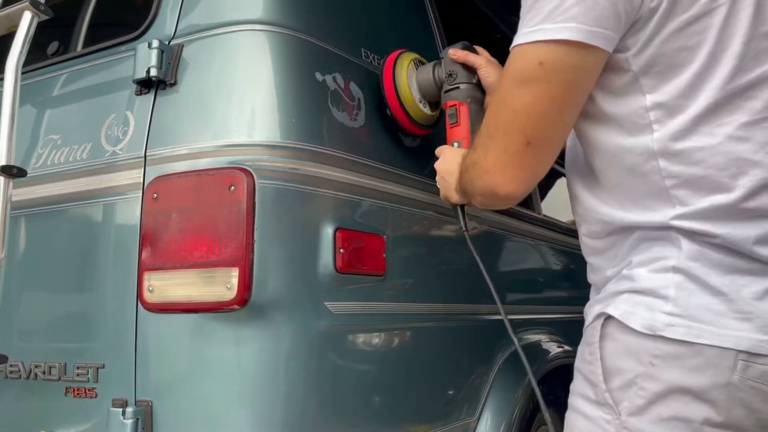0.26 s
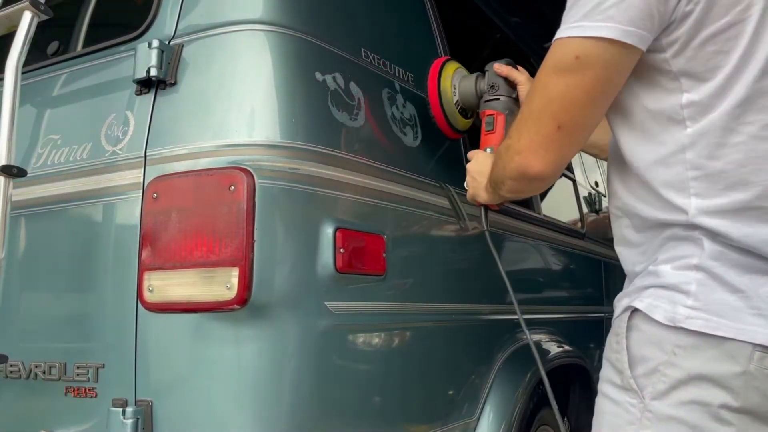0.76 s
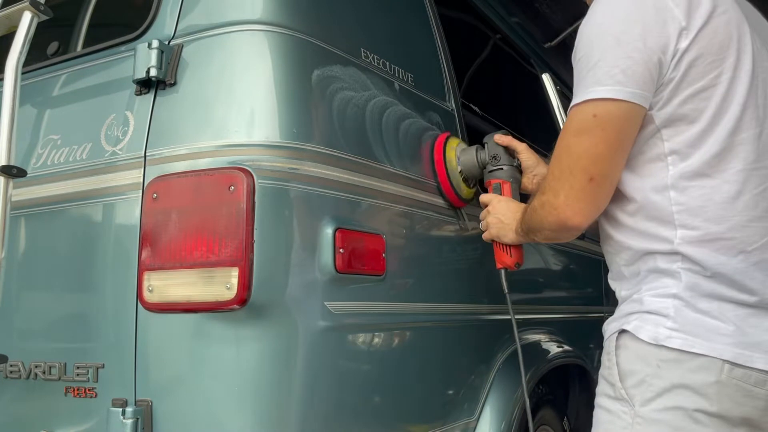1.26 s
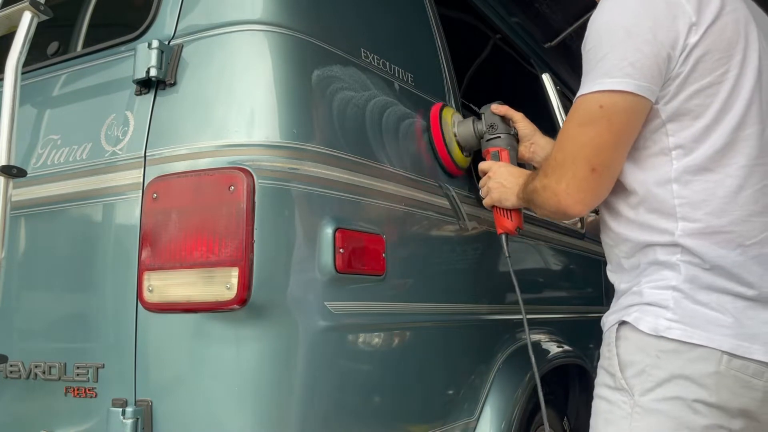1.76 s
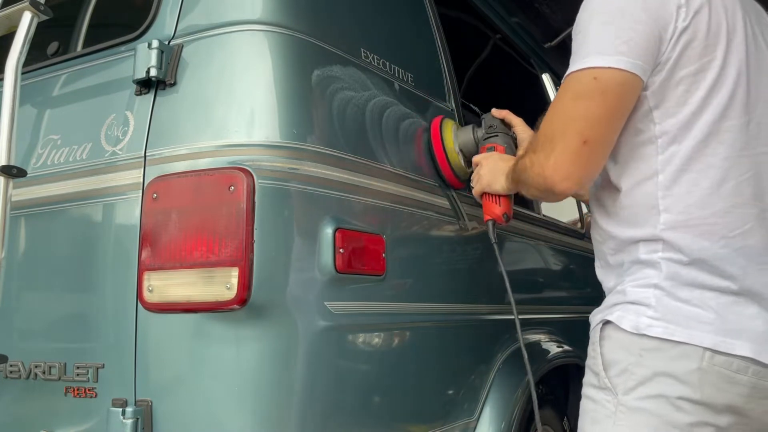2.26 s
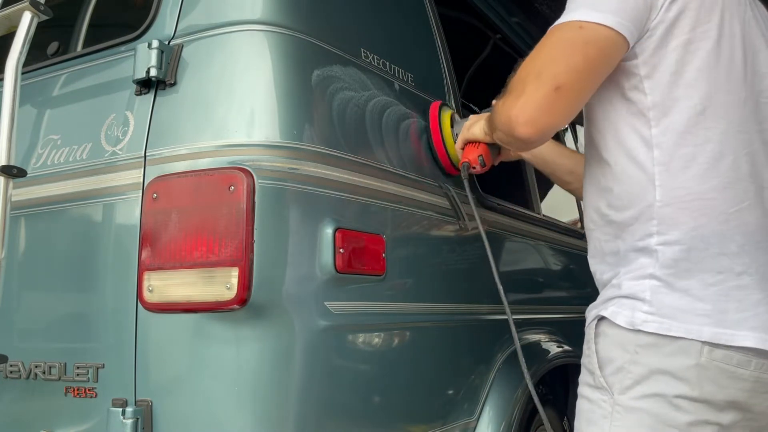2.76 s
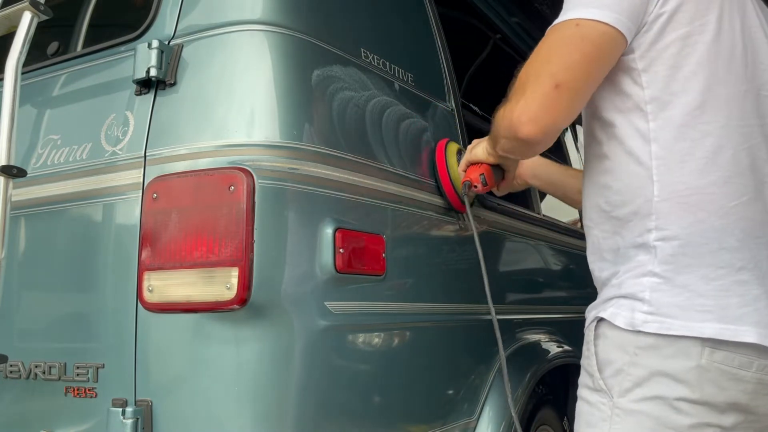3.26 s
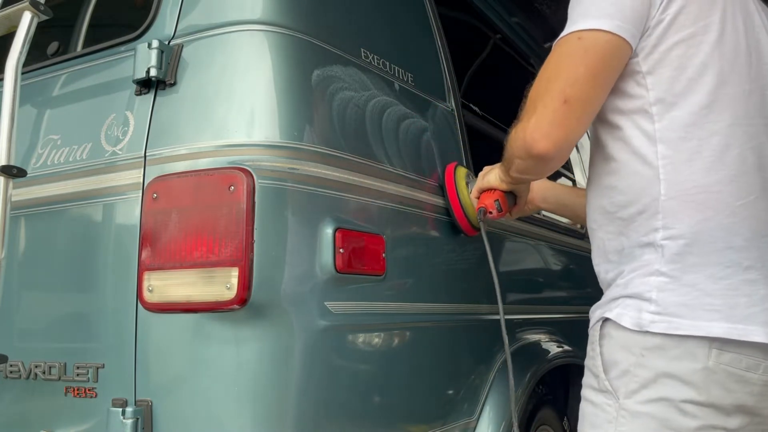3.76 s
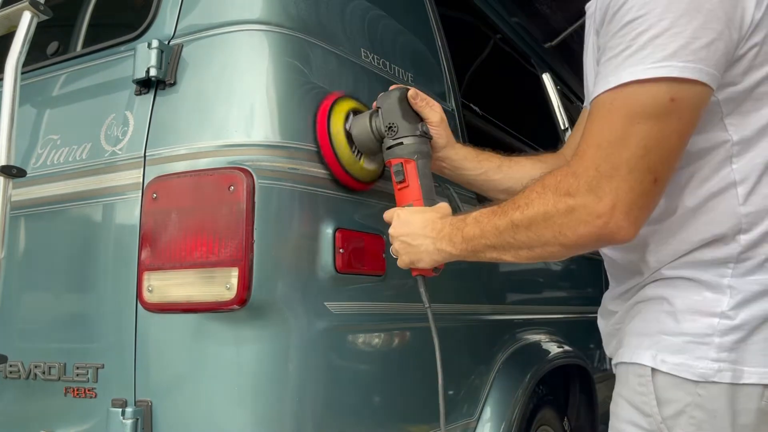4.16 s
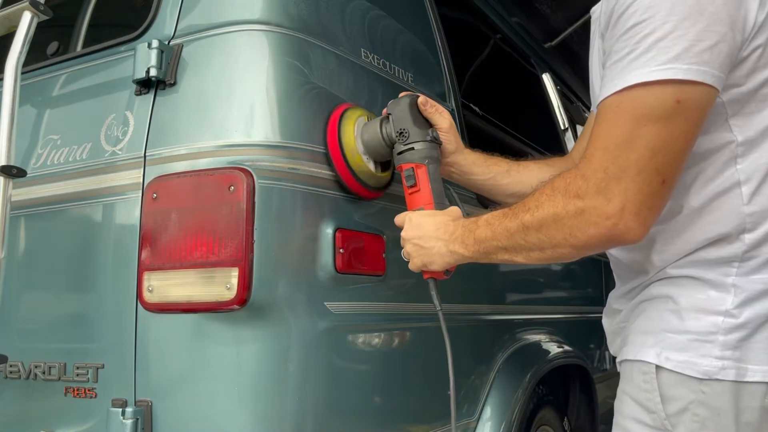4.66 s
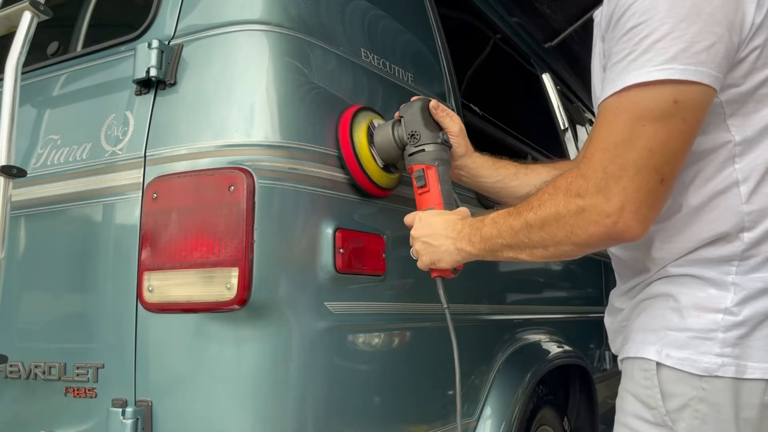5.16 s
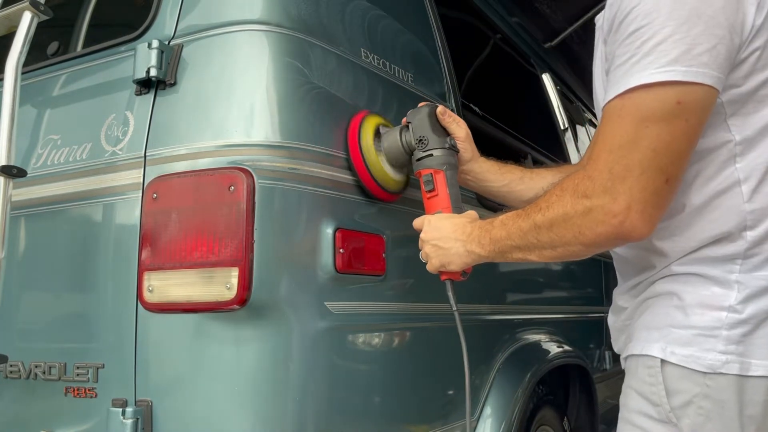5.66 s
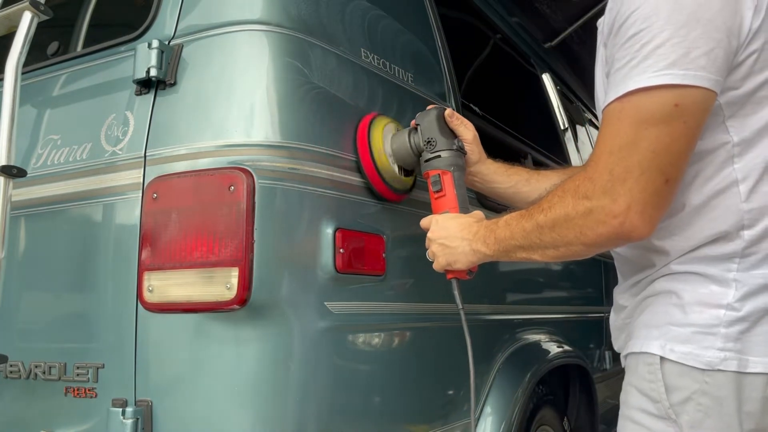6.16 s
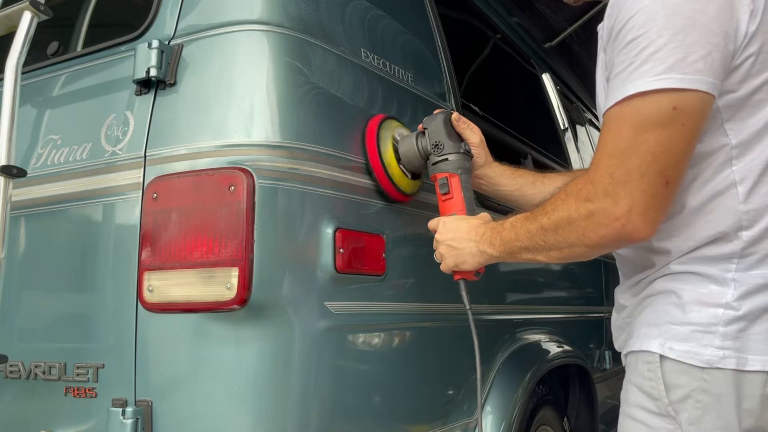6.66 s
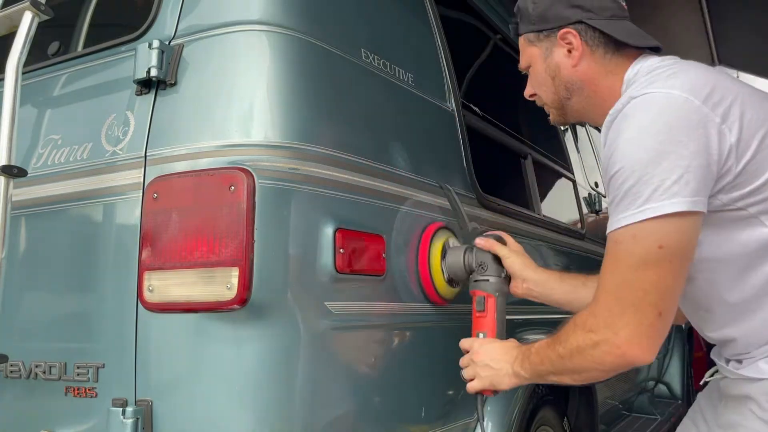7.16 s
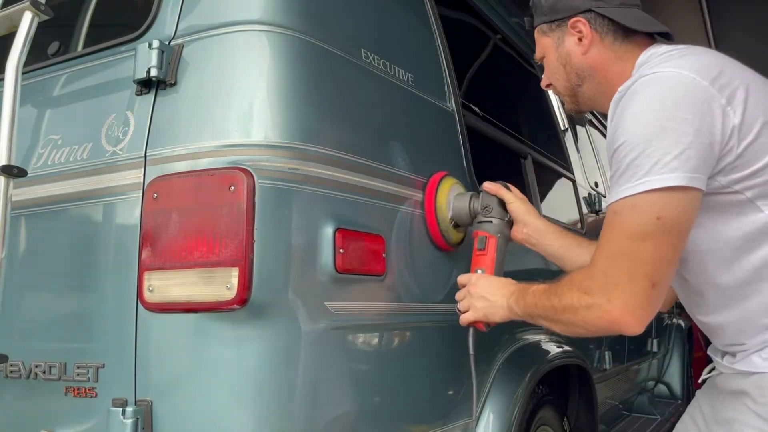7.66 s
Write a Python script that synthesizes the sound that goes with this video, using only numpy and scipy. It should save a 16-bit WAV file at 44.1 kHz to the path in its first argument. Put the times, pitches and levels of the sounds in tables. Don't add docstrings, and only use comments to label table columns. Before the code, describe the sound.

From 0 to 0.9 s the yard is quiet: distant traffic rumbles, swelling slightly near 0.45 s, under thin hiss and a very faint cricket. Dry plastic switch ticks run from 0.27 to 0.65 s, strongest around 0.41-0.45 s. At 0.92 s it cuts instantly to a running polisher: a piercing whine near 9 kHz, fluttering and fading, over moderate fan roar and shaft hum; it dulls around 2.8-3 s. At 4.13 s a cut brings a faster setting, whine near 10.6 kHz, a stronger low hum and panel thump near 62 Hz, and many uneven woody-metallic knocks around 2.5 kHz, densest at first. At 7.03 s a louder passage starts lower, near 8.9 kHz, climbing to about 9.9 kHz by the end; roar and gear hum peak around 7.4 s, then drop back, continuing to the abrupt end at 7.9 s. Close, dry outdoor stereo.

```python
import sys
import numpy as np
from scipy import signal
from scipy.fft import rfft, irfft, next_fast_len
from scipy.io import wavfile
from scipy.ndimage import uniform_filter1d

SR = 44100
rng = np.random.default_rng(int(sys.argv[2]) if len(sys.argv) > 2 else 0)


def volts_from_decibels(level):
    exponent = np.asarray(level, float) / 20
    return 10 ** exponent


def output_pcm(signal):
    pcm = np.clip(np.atleast_2d(signal).T, -1, 1) * 32767
    wavfile.write(sys.argv[1], SR, np.round(pcm).astype(np.int16))


N = 348390

SLOTS, PINION_TEETH, RING_TEETH = 30, 6, 34
MAINS_HZ = 120


def read(points, hz):
    table_hz, value = np.transpose(points)
    return np.interp(np.log(hz + 1), np.log(table_hz + 1), value)


def evened(x):
    return x / np.sqrt(np.mean(x ** 2) + 1e-20)


def columns(rows, t):
    s, *values = np.transpose(rows)
    return [np.interp(t, s, v) for v in values]


def bumps(rows, x):
    total_db = 0 * x
    for at, db, width in rows:
        if x.min() <= at <= x.max() + .02:
            total_db = total_db + db * np.exp(-.5 * ((x - at) / width) ** 2)
    return total_db


def drift(n, hz):
    knots = rng.standard_normal(round(n / SR * 400) + 400)
    pole = np.exp(-2 * np.pi * hz / 400)
    knots = evened(signal.lfilter([1], [1, -2 * pole, pole ** 2], knots)[398:])
    return np.interp(np.arange(n) * 400 / SR, np.arange(len(knots)), knots)


def tone(turns, db):
    return np.sqrt(2) * volts_from_decibels(db) * np.cos(2 * np.pi * (turns + rng.random()))


def ring(modes, bright_db=0):
    t = np.arange(2000) / SR
    out = np.zeros(len(t))
    for hz, db, t60 in modes:
        level_db = db + bright_db * np.log2(hz / modes[0][0]) - 60 * t / t60
        out += volts_from_decibels(level_db) * np.sin(2 * np.pi * hz * rng.uniform(1.0, 1.04) * t)
    return out


def power(t, colour, low_db, high_db, split_hz, bands):
    hz = np.fft.rfftfreq(1024, 1 / SR)
    at = np.minimum(np.arange(len(t) // 256 + 5) * 256, len(t) - 1)
    shape = volts_from_decibels(2 * read(colour, hz))[:, None]
    gains_db = []
    for db, (from_hz, to_hz) in zip((low_db, high_db), bands):
        band_power = shape[(hz > from_hz) & (hz < to_hz)].sum() / 1.5
        gains_db.append(db[at] - 10 * np.log10(band_power))
    low, high = gains_db
    upper = 1 / (1 + (split_hz / (hz[:, None] + 1)) ** 6)
    return shape * volts_from_decibels(2 * ((1 - upper) * low + upper * high))


def noise(n, field, patchy_db):
    a, b, c, d, patches = rng.standard_normal((field.shape[1], 513, 5)).T
    patches = uniform_filter1d(patches, size=10, axis=0)
    patches = evened(uniform_filter1d(patches, size=12, axis=1))
    streaks = uniform_filter1d(a[::-1], size=2, axis=0)
    streaks = evened(uniform_filter1d(streaks, size=160, axis=1))
    z = np.array([a + 1j * b, c + 1j * d]) * np.sqrt(field) * volts_from_decibels(patchy_db * patches + 1.3 * streaks)
    return signal.istft(z, nperseg=1024, noverlap=768)[1][:, :n]


# (pitch_hz, lead_radians)
PORT_LEAD = [(0, 0), (50, .09), (200, .11), (950, 0.18), (1400, -0.25), (2240, .3), (2580, 0.9),
             (3270, 1.1), (4130, .5), (5080, 0.7), (6800, 0.1), (7490, 1.0), (8790, -0.3), (9010, -.92),
             (9400, -1.8), (9850, -2.55), (10600, -3.68), (11500, -5.2)]
# (pitch_hz, left_minus_right_db)
PORT_TILT = [(60, 0.5), (140, 0.5), (340, 0.0), (800, 1.5), (1900, 1.0), (3400, 2.5), (5500, 3), (8000, 1),
             (10700, -.3)]


def ports(tones, pair, same):
    size = next_fast_len(len(tones) + 512)
    hz = np.fft.rfftfreq(size, 1 / SR)
    likeness = np.clip(read(same, hz), -1, 1)
    clean, (near, far) = rfft(tones, size), rfft(pair, size)
    half = volts_from_decibels(read(PORT_TILT, hz) / 2) * np.exp(.5j * read(PORT_LEAD, hz))
    left = (clean + near) * half
    right = (clean + likeness * near + np.sqrt(1 - likeness ** 2) * far) / half
    return irfft(np.array([left, right]), size)[:, :len(tones)]


# (start_s, end_s, start_pitch_hz, end_pitch_hz, level_db, wander_turns)
TRAFFIC_TONES = [(0.3, 0.47, 55, 68, -41.5, 0.08), (-0.1, 0.04, 54, 50, -41, 0.08),
                 (.77, .85, 47, 55, -41, .08), (.05, 0.18, 100, 120, -49, .15),
                 (-0.05, .42, 1030, 1010, -54, .15), (0.4, 0.7, 925, 915, -55, 0.17),
                 (.3, .45, 1390, 1450, -56, .15), (-1, .08, 960, 1065, -56, .15),
                 (.27, 0.39, 1220, 1215, -56, .1), (0.8, 0.67, 1450, 1385, -56.5, 0.43),
                 (3, 4, 97, 92, -50, 0.081), (3.0, 3.42, 211.4, 210, -55, .04),
                 (3.5, 4.12, 188, 200, -58.5, .06)]


def traffic_tones(t):
    out = np.zeros(len(t))
    for start, end, hz, end_hz, db, wander in TRAFFIC_TONES:
        if end < t[0] - .2 or start > t[-1] + .2:
            continue
        fade_db = 40 * np.clip(np.minimum(t - start, end - t) / 0.1, -1, 0)
        turns = np.cumsum(np.interp(t, [start, end], [hz, end_hz])) / SR + wander * drift(len(t), 8.4)
        out += tone(turns, db + fade_db + 3.6 * drift(len(t), 12.0))
    return out


# (start_s, peak_db, brightness_db_per_octave)
SWITCH_TICKS = [(0.2693, -46.5, -11), (0.3752, -39, -12), (0.3825, -42, -14), (0.4114, -30, -3.5),
                (0.4527, -28.5, 0.5), (0.463, -39, 0), (0.5695, -48, 9), (0.6019, -43, -11),
                (0.6175, -50, 6), (0.6459, -40, -3)]
# (pitch_hz, level_db, fade_by_60_db_s)
SWITCH_RING = [(2640, 3.5, 0.014), (1950, -2, .006), (3020, 3, 0.01), (3550, -2, 0.0086), (4560, -12, .008),
               (5040, 2, 0.01), (5970, -3, 0.0045), (7100, -6, .003), (8300, 0, 0.0099), (8950, -3, 0.014)]


def switch_ticks(t):
    out = np.zeros(len(t))
    for s, db, bright_db in SWITCH_TICKS:
        scrape = rng.standard_normal(130) * np.exp(-np.arange(130) / 45)
        click = np.convolve(ring(SWITCH_RING, bright_db), scrape)
        out[round(s * SR):][:len(click)] += volts_from_decibels(db + 4.0) * click / abs(click).max()
    return out


# (middle_s, rise_db, width_s)
CRICKET_CHIRPS = [
    (.35, 10, 0.2),
    (.9, 10, 0.026),
]


def cricket(t):
    return tone(4950 * t + 0.22 * drift(len(t), 18), -80 + bumps(CRICKET_CHIRPS, t))


# (pitch_hz, level_db_per_hz)
YARD_COLOUR = [(18, -35), (30, -1.5), (60, 0.5), (105, 0), (150, -8), (264, -12.5), (402, -22), (704, -18),
               (791, -23), (910, -16.5), (1390, -20.5), (2020, -27), (2500, -32), (3450, -41), (4900, -40),
               (7460, -48), (8000, -43), (10400, -69), (17600, -120)]
# (pitch_hz, level_db_per_hz)
HISS_COLOUR = [(5500, -44), (7200, -33.5), (8400, -4.5), (9100, 1.5), (9800, -3.5), (10400, 0),
               (11000, -6.5), (12000, -16), (16000, -21.5)]
# (middle_s, rise_db, width_s)
PASSING_TRAFFIC = [
    (.15, -1, 0.079),
    (.45, 2.5, 0.12),
]
# (pitch_hz, likeness_0_to_1)
FAR_LIKENESS = [(60, 0.97), (170, 0.98), (480, 0.45), (1350, 0.58), (3800, 0.28), (10700, 0.93)]


def yard(t):
    swell_db = bumps(PASSING_TRAFFIC, t)
    rumble_db = -41.5 + 0.56 * swell_db
    wash_db = -44 + swell_db - 6.5 * t
    tones = traffic_tones(t) + switch_ticks(t) + cricket(t)
    field = power(t, YARD_COLOUR, rumble_db, wash_db, 290, [(30, 300), (400, 2000)])
    hiss_db = np.full(len(t), -62.)
    field += power(t, HISS_COLOUR, hiss_db, hiss_db, 9000, [(7200, 9270)] * 2)
    return ports(tones, noise(len(t), field, 0.98), FAR_LIKENESS)


# (time_s, slot_whine_hz)
MOTOR_SPEEDS = [
    [(.92, 9005), (1.25, 9009), (1.65, 9022), (2.02, 9017), (2.25, 8998), (2.6, 8988), (2.94, 9031),
     (3.31, 8973), (3.75, 9005), (3.97, 9006), (4.13, 9029)],
    [(4.13, 10545), (4.45, 10551), (4.97, 10594), (5.48, 10572), (5.7, 10589), (5.82, 10581), (6.08, 10602),
     (7.03, 10596)],
]


def motor_speed(t, shot):
    if shot < len(MOTOR_SPEEDS):
        return uniform_filter1d(columns(MOTOR_SPEEDS[shot], t)[0], size=6000, mode="nearest")
    since = t - t[0]
    start_hz, climb_hz_per_s, tiring_hz_per_s2 = 8903, 1924.6, 915.8
    return start_hz + climb_hz_per_s * since - tiring_hz_per_s2 * since ** 2


WHINE_DB = [-22.5, -24, -16]
# (middle_s, change_db, width_s)
WHINE_FADES = [(1.0, -1.5, 0.022), (1.16, -1.5, 0.025), (1.65, -6.5, 0.051), (1.92, -5, 0.13),
               (2.35, -4, 0.16), (2.62, -4.5, 0.027), (2.8, -1, 0.026), (2.975, -13, 0.025),
               (3.08, -4.5, 0.039), (3.26, -3.5, 0.03), (3.49, -3, 0.017), (3.7, 0, 0.021),
               (3.95, 2.5, 0.11), (4.07, -2, 0.047), (4.33, 3, 0.047), (4.55, -0.5, 0.14),
               (4.92, -18, 0.098), (5.37, -13, 0.11), (5.75, -10, 0.077), (6.2, 0, 0.092), (6.7, -1, 0.16),
               (7.1, -5.5, 0.041), (7.167, -17.5, 0.014), (7.25, -6.5, 0.032), (7.367, -8, 0.012),
               (7.42, 1.5, 0.015), (7.6, -6, 0.081), (7.685, -6, 0.0093), (7.89, -8, 0.039)]
# (orbits_away, mains_ripples_away, level_db)
WHINE_SIDEBANDS = [(-1, 0, -17.5), (1, 0, -23), (-2, 0, -31), (0, -1, -26), (0, 1, -42)]


def slot_whine(t, shot, shaft, orbit, shadow_db):
    n = len(t)
    fade_db = shadow_db + bumps(WHINE_FADES, t)
    turns = SLOTS * shaft + .012 * drift(n, 30)
    out = tone(turns, fade_db + WHINE_DB[shot] + 1.3 * drift(n, 22.0))
    for orbits, ripples, db in WHINE_SIDEBANDS:
        beside = turns + orbits * orbit + ripples * MAINS_HZ * t + 0.049 * drift(n, 5.5)
        out += tone(beside, .8 * fade_db + WHINE_DB[shot] + db + 3.5 * drift(n, 4))
    return out


# (multiple_of_shaft_speed, shot_1_db,
# shot_2_db, shot_3_db)
SHAFT_TONES = [(1, -25, -17.5, -17), (2, -30, -16, -30), (3, -30, -22, -28), (4, -28, -22, -22),
               (5, -28, -14, -24), (7, -21, -14, -21), (6.8235, -32, -18, -30), (10, -18, -28, -18),
               (11, -32, -25, -32), (11.32, -32, -23, -32), (15, -28, -25, -32), (16, -20, -26, -28),
               (19, -21, -30, -26), (20, -22, -32, -32), (25, -27, -32, -28), (31, -30, -28, -27)]


def shaft_hum(shaft, shot, roar_db):
    n = len(shaft)
    out = np.zeros(n)
    for multiple, *db in SHAFT_TONES:
        turns = multiple * shaft + 0.085 * drift(n, 8)
        out += tone(turns, roar_db + db[shot] + 1.2 * drift(n, 3))
    return out


TOOTH_DB = [-55.5, -46.5, -39.5]
PARTNER_DB = [-70.5, -53, -40.5]
# (middle_s, change_db, width_s)
TOOTH_SWELLS = [(.93, -9, 0.16), (2.5, 5.5, 0.23), (4.14, -14, 0.14), (5.25, 2, 0.42), (6.05, -3, 0.16),
                (7.04, -5, .02), (7.165, 8, 0.029), (7.21, -5, .01), (7.24, 8, .012), (7.28, -4, .014),
                (7.35, 10.5, 0.032), (7.42, 7, .01), (7.49, 9, 0.033), (7.54, -18, .009), (7.65, 5, .06),
                (7.74, -3, .012), (7.84, 4.5, .05)]
# (middle_s, change_db, width_s)
PARTNER_SWELLS = [(1.4, -7, 0.36), (3.4, 4.5, 0.42), (4.14, -10, .2), (5.65, -17, 0.3), (6.13, 14, 0.11),
                  (7.1, 5, .022), (7.18, 10, .016), (7.22, -5, .01), (7.28, -12, .012), (7.35, 8, 0.041),
                  (7.42, 6, .01), (7.48, 9, 0.028), (7.54, -11, .009), (7.57, 7, .012), (7.6, -9, .008),
                  (7.76, 8, .012), (7.84, -3.5, .03)]
# (multiple_of_tooth_rate, shot_1_db, shot_2_db, shot_3_db)
GEAR_TONES = [(2, -23, -19, -20), (3, -19, -30, -28), (4, -26, -28, -34)]
GEAR_TWIST = [.04, .14, .06]


def gears(t, shot, shaft, orbit, press_db, roar_db):
    n = len(t)
    twist = GEAR_TWIST[shot] * np.cos(2 * np.pi * MAINS_HZ * t)
    teeth = PINION_TEETH * shaft
    tooth_db = TOOTH_DB[shot] + 0.72 * press_db + bumps(TOOTH_SWELLS, t)
    partner_db = PARTNER_DB[shot] + 0.72 * press_db + bumps(PARTNER_SWELLS, t)
    out = tone(teeth + twist + 0.037 * drift(n, 11), tooth_db + .8 * drift(n, 5.4))
    out += tone(teeth + orbit + 0.022 * drift(n, 10), partner_db + .8 * drift(n, 12))
    for multiple, *db in GEAR_TONES:
        uneven = 0.026 * np.cos(2 * np.pi * orbit) + multiple * twist + 0.029 * drift(n, 12.0)
        level_db = roar_db + db[shot] + 3.6 * drift(n, 7.6)
        level_db += 2.6 * np.sin(2 * np.pi * MAINS_HZ * t)
        level_db += 2.7 * np.cos(2 * np.pi * orbit + 1.3)
        out += tone(multiple * teeth + uneven, level_db)
    return out


THUMP_DB = [-47, -33.5, -31.5]
TWICE_DB = [-54.5, -51.5, -31.5]
# (middle_s, change_db, width_s)
THUMP_SWELLS = [(1.2, -5, 0.14), (1.66, -1, 0.075), (1.88, 2.5, 0.098), (3.42, 2, 0.23), (7.04, -8, 0.019)]
# (middle_s, change_db, width_s)
TWICE_SWELLS = [(6.8, -1, .04), (7.22, -1.5, .04), (7.78, 2.5, .06), (1.4, 3.5, 0.13), (3.1, -5, 0.18),
                (3.42, 5, 0.12), (6.53, -11, 0.074), (6.92, -8, 0.09)]
# (pitch_hz, change_db, width_hz)
PANEL_ANSWER = [
    (107.5, -4, .6),
    (112.3, 9, 1.5),
    (114.6, -17, 0.72),
]
# (multiple_of_orbit, shot_1_db, shot_2_db, shot_3_db)
PANEL_TONES = [(3, -21, -32, -22), (4, -21, -33, -19), (5, -16, -27, -26)]
# (middle_s, rise_db, width_s)
PANEL_BOOMS = [
    (2.05, 9.8, 0.17),
    (7.33, 10.4, 0.062),
]


def panel_thump(t, shot, orbit, orbit_hz, press_db):
    n = len(t)
    thump_db = THUMP_DB[shot] + 1.4 * press_db + bumps(THUMP_SWELLS, t)
    twice_db = TWICE_DB[shot] + 1.3 * press_db + bumps(TWICE_SWELLS, t)
    twice_db += bumps(PANEL_ANSWER, 2 * orbit_hz)
    out = tone(orbit, thump_db + .6 * drift(n, 8.7))
    out += tone(2 * orbit, twice_db + 2.1 * drift(n, 8.6))
    for multiple, *db in PANEL_TONES:
        boom_db = bumps(PANEL_BOOMS, t) * (multiple == 3)
        out += tone(multiple * orbit, thump_db + db[shot] + boom_db + 1.8 * drift(n, 2.6))
    return out


KNOCK_DB = [-74, -55, -59.5]
DRY_PAD_DB = [5.5, 8.5, 2]
# (start_s, peak_db, ring_pitch_hz)
HARD_KNOCKS = [(4.138, -23, 2560), (4.1553, -25, 2720), (4.1867, -24, 2630), (4.2535, -25, 2440),
               (4.269, -24, 2310), (4.2875, -25, 2660), (4.3364, -24, 2470), (4.3508, -20, 2550),
               (4.3862, -28, 2340), (4.3977, -24, 2660), (4.511, -20, 2420), (4.5284, -22, 2300),
               (4.6257, -19, 2480), (4.7035, -19, 2500), (4.7459, -21, 2550), (4.815, -29, 2530),
               (4.849, -22, 2400), (4.8951, -22, 2470), (4.929, -21, 2690), (5.0368, -24, 2470),
               (5.2293, -26, 2230), (5.2496, -24, 2610), (5.3453, -26, 2240), (5.46, -25, 2580),
               (5.4987, -25, 2260), (5.586, -27, 2430), (5.7008, -22, 2590), (5.7796, -26, 2360),
               (5.9248, -26, 2400), (6.0515, -23, 2470), (6.1722, -34, 2410), (6.246, -23, 2370),
               (6.2949, -24, 2470), (6.3553, -23, 2660), (6.4201, -24, 2480), (6.538, -26, 2370),
               (6.7888, -25, 2330), (6.8053, -24, 2530), (6.8531, -26, 2480), (6.983, -23, 2630)]


def bearing_knocks(t, shot, orbit):
    n = len(t)
    dry_db = DRY_PAD_DB[shot] * np.exp(-(t - t[0]) / 0.86)
    blows = np.diff(np.floor(orbit + .53 + .05 * drift(n, 30)), prepend=0) > 0
    blows = blows * volts_from_decibels(dry_db + KNOCK_DB[shot] + 4.2 * rng.standard_normal(n))
    bearing = evened(ring([(2590, 9.0, 0.02), (2910, -1.0, 0.014), (2310, -19.0, .01)]))
    hard = np.zeros(n + 2000)
    for s, db, hz in HARD_KNOCKS:
        if t[0] <= s <= t[-1]:
            knock = ring([(hz, 0, .016), (1.07 * hz, -7, .01)])
            hard[round((s - t[0]) * SR):][:2000] += volts_from_decibels(db - 3.0) * knock
    return signal.oaconvolve(blows, bearing)[:n] + hard[:n]


# (time_s, pitch_hz, depth_db)
ECHO_NOTCH = [(.92, 4280, 1), (2.2, 4150, 6), (2.8, 4620, 4), (3.3, 4650, 5), (4.13, 4630, 4),
              (7.03, 4550, 3), (7.9, 4640, 4)]
# (middle_s, hold_s, pitch_hz, change_db, width_hz)
PANEL_ECHOES = [(1.1, 0.46, 760, 3, 70), (2.6, .25, 740, -4, 100), (6.2, .4, 3750, 1.2, 330),
                (7.13, 0.092, 3250, 3.5, 130), (1.9, 0.29, 2900, 3.5, 240), (1.4, 0.83, 5400, 0.5, 830),
                (2.1, .6, 6900, -3, 440), (2.45, 0.21, 5650, 3.5, 320), (2.8, 0.32, 3100, -4.5, 190),
                (2.96, .35, 1520, 4.5, 310), (2.6, .2, 4900, -4, 300), (3.2, 0.67, 3850, 1.5, 250),
                (4.2, .2, 1500, 1.5, 350), (4.03, 0.24, 1900, 2, 400), (4.5, 0.37, 3100, -0.5, 280),
                (4.5, .3, 1200, 2, 270), (6.3, 0.6, 3170, 2.5, 190), (7.08, 0.054, 5380, 7, 62),
                (7.12, 0.13, 3750, 3, 330), (7.32, 0.072, 3900, 3, 190), (7.25, 0.091, 2700, 6, 230),
                (8.7, 0.11, 1640, -5, 250), (7.6, .2, 5600, -1.5, 400), (2.6, .3, 370, -4.5, 80),
                (4.1, .4, 450, -2, 45), (7.05, .04, 2000, 2, 200), (7.83, 0.08, 3030, 8, 90),
                (6.3, .4, 2600, -0.5, 180), (7.3, 0.026, 4000, 4, 70), (4.48, 0.043, 2500, 4, 220),
                (1.5, .4, 6600, -2.5, 180)]


def add_echoes(field, start_s):
    hz = np.fft.rfftfreq(1024, 1 / SR)[:, None]
    frame_s = start_s + np.arange(field.shape[1]) * 256 / SR
    notch_hz, depth_db = columns(ECHO_NOTCH, frame_s)
    return_field = field * volts_from_decibels(-2 * depth_db * np.exp(-((hz - notch_hz) / 350) ** 2))
    end_s = start_s + (field.shape[1] - 5) * 256 / SR
    for s, hold, centre_hz, db, width in PANEL_ECHOES:
        if start_s <= s <= end_s:
            band = np.exp(-.5 * ((hz - centre_hz) / width) ** 2)
            return_field *= 1 + (volts_from_decibels(2 * db) - 1) * band * np.exp(-.5 * ((frame_s - s) / hold) ** 2)
    return return_field


# (pitch_hz, level_db_per_hz)
BODY_COLOURS = [
    [(82, -38), (140, -10.5), (200, -10), (237, -14), (306, -6.5), (511, -13), (570, -6), (690, 2),
     (805, 2.5), (845, -2.5), (1075, 0), (1190, -5), (1400, -2.5), (2450, -7.5), (3000, -6), (4440, -11.5),
     (5540, -10), (7030, -15.5), (8200, -9), (10700, -37), (18000, -120)],
    [(82, -37), (140, -17), (152, -30), (184, -31), (211, -32), (233, -12.5), (351, -15), (396, -9.5),
     (566, -10), (694, -2), (850, -4.5), (1050, -2), (1130, -9), (1400, -3), (1620, -6), (1800, -3.5),
     (2150, -5), (2450, -0.5), (2680, -2), (2810, -4), (3150, -4), (3310, -8), (4670, -10), (7400, -12.5),
     (8200, -7), (10700, -10), (18000, -120)],
    [(82, -40), (140, -13), (267, -14), (477, -11), (547, -18.5), (756, -3.5), (950, -13), (1140, -4.5),
     (1680, -10), (1900, -4.5), (2410, -12.5), (3210, -9), (3950, -9), (4600, -9.5), (6800, -16.5),
     (8200, -10), (10700, -39.5), (18000, -120)],
]
HISS_DB = [-43, -33.5, -36.5]
YARD_DB = [-51, -55, -51]


def fan_roar(t, shot, shaft, orbit, roar_db, air_db):
    n = len(t)
    field = power(t, BODY_COLOURS[shot], roar_db - 0.4, air_db, 2540, [(500, 2890), (3500, 6880)])
    hiss_db = air_db - air_db.mean() + HISS_DB[shot]
    field += power(t, HISS_COLOUR, hiss_db, hiss_db, 9000, [(7200, 11000)] * 2)
    field = add_echoes(field, t[0])
    far_db = np.full(n, YARD_DB[shot])
    field += power(t, YARD_COLOUR, far_db, far_db + 0.5, 350, [(30, 300), (400, 1800)])
    roar = noise(n, field, 0.81)
    throb = 0.19 * np.cos(2 * np.pi * MAINS_HZ * t)
    throb += 0.14 * np.cos(2 * np.pi * shaft) + 0.078 * np.cos(2 * np.pi * orbit)
    high = signal.sosfilt(signal.butter(2, 1600, "high", fs=SR, output="sos"), roar)
    return roar + throb * high


# (time_s, pressure_db)
PAD_PRESSURE = [
    [(.92, 0), (4.13, 0.84)],
    [(4.13, -0.5), (4.7, 0.3), (7.03, 0.26)],
    [(7.03, -0.5), (7.13, -0.5), (7.26, 0), (7.38, 1), (7.46, -6.5), (7.74, -5.5), (7.9, -9.5)],
]
# (middle_s, whine_change_db, width_s)
ARM_SHADOW = [
    (2.78, -11.5, 0.19),
]
ROAR_DB = [-39.5, -33, -28]
AIR_DB = [-41.5, -39, -34.5]
# (pitch_hz, likeness_0_to_1)
NEAR_LIKENESS = [(60, 0.95), (250, 0.95), (800, 0.95), (1300, 0.85), (1900, 0.77), (4500, 0.88),
                 (7000, 0.71), (9000, 0.7), (11000, 0.83)]


def polisher(t, shot):
    whine_hz = motor_speed(t, shot)
    shaft = np.cumsum(whine_hz) / SLOTS / SR
    orbit = shaft * PINION_TEETH / RING_TEETH
    orbit_hz = whine_hz / SLOTS * PINION_TEETH / RING_TEETH
    press_db, = columns(PAD_PRESSURE[shot], t)
    shadow_db = bumps(ARM_SHADOW, t)
    roar_db = ROAR_DB[shot] + press_db + 0.16 * shadow_db
    air_db = AIR_DB[shot] + 0.7 * press_db + 0.27 * shadow_db
    tones = slot_whine(t, shot, shaft, orbit, shadow_db)
    tones += shaft_hum(shaft, shot, roar_db)
    tones += gears(t, shot, shaft, orbit, press_db, roar_db)
    tones += panel_thump(t, shot, orbit, orbit_hz, press_db)
    tones += traffic_tones(t)
    tones += bearing_knocks(t, shot, orbit)
    return ports(tones, fan_roar(t, shot, shaft, orbit, roar_db, air_db), NEAR_LIKENESS)


# (middle_s, change_db, width_s)
TOP_SWELLS = [(2.1, -7.5, .35), (2.63, 3, 0.026), (2.8, 6, .04), (2.97, 11.5, 0.047), (4.14, 4, 0.016),
              (4.4, 3.5, .3), (4.9, -3.5, 0.098), (5.33, -1.5, .1), (1.67, 6, .02), (7.18, 0.5, .02),
              (5.72, 4.5, 0.027), (6.1, 5, .25), (6.85, -3, .15), (7.57, 7, .03)]
TOP_DROPOUTS = [5.555, 5.78, 6.155, 6.475, 6.54, 6.695, 6.84, 6.91, 7.0]


def drop_weak_highs(x):
    mid_side = np.pad([x[0] + x[1], x[0] - x[1]], ((0, 0), (72, 0)))
    hz, t, z = signal.stft(mid_side, SR, "cosine", 2048, 1024)
    hz = hz[:, None]
    bands = z[:, :1024].reshape(2, 64, 16, -1)
    band_db = 10 * np.log10((abs(bands) ** 2).mean(2) + 1e-20)
    band_hz = hz[8:1024:16]
    loud_db = np.where(band_hz > 7000, band_db.max(0), -200)
    above_khz = (band_hz - band_hz[loud_db.argmax(0), 0]) / 1000
    above_db = 0.5 * above_khz + 7.0 * np.exp(-abs(above_khz) / 1.6)
    below_db = 3.8 + 5.0 * above_khz
    mask_db = loud_db.max(0) - 29.5 + 8. * (band_hz > 12700)
    mask_db += np.where(above_khz > 0, above_db, below_db)
    mask_db += 5.0 * np.exp(-((above_khz + .42) / 0.23) ** 2)
    chance = uniform_filter1d(rng.standard_normal(band_db.shape), size=2, axis=2)
    mask_db = mask_db + 3.6 * evened(chance) + 2.2 * evened(chance[:, :1])
    mask_db = np.maximum(mask_db, -83 + 2.8 * (band_hz / 1000 - 12))
    mask_db -= bumps(TOP_SWELLS, t) * (above_khz > 0)
    mask_db[0] += bumps([(s, 40, .015) for s in TOP_DROPOUTS], t) * (band_hz > 10000)
    keep = (band_db > mask_db) | (band_hz < 7400)
    z[:, :1024] = (bands * keep[:, :, None]).reshape(2, 1024, -1)
    top = abs(z).max(0) * (hz > 7400)
    beyond_hz = hz - hz[top.argmax(0), 0]
    floor_db = np.where(beyond_hz > 0, -33, -38 + 7.0 * evened(chance[0, 1]))
    z *= (abs(z) > volts_from_decibels(floor_db) * top.max(0)) | (beyond_hz < -750) | (beyond_hz > 350)
    mid, side = signal.istft(z, SR, "cosine", 2048, 1024)[1][:, 72:N + 72]
    return np.array([mid + side, mid - side]) / 2


SHOT_EDGES = [0, .9163, 4.1298, 7.029, 7.9]


def scene():
    edges = np.minimum(np.round(np.array(SHOT_EDGES) * SR).astype(int), N)
    edges[-1] = N
    times = [np.arange(a, b) / SR for a, b in zip(edges, edges[1:])]
    working = [polisher(t, shot) for shot, t in enumerate(times[1:])]
    return np.hstack([yard(times[0])] + working)


def roll_off(x):
    return signal.sosfilt(signal.butter(12, 16000, fs=SR, output="sos"), x)


def record(dry):
    bass_cut = signal.butter(4, 42, "high", fs=SR, output="sos")
    mix = drop_weak_highs(signal.sosfilt(bass_cut, dry))
    return roll_off(mix)


dry = scene()
out = record(dry)
output_pcm(out)
```